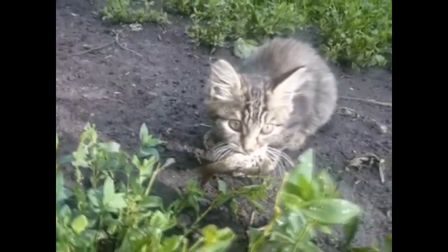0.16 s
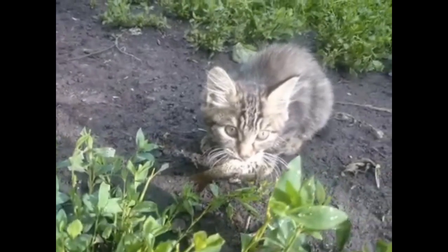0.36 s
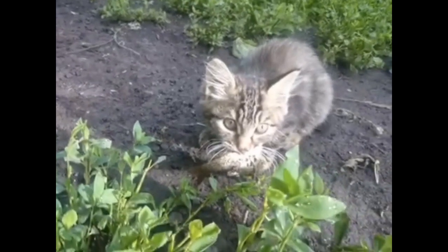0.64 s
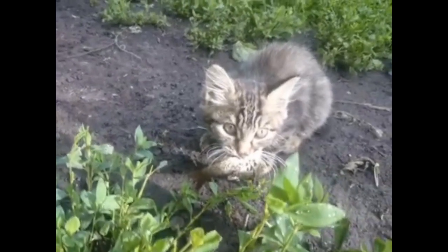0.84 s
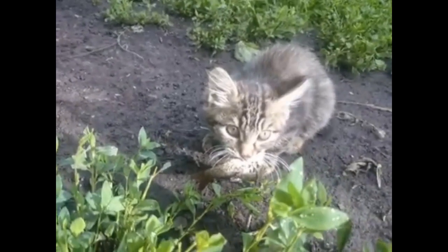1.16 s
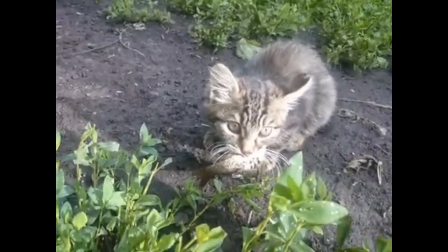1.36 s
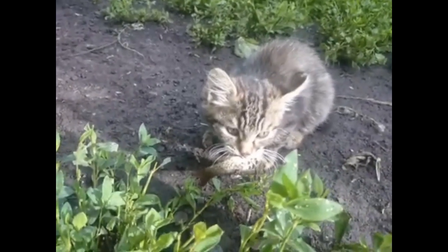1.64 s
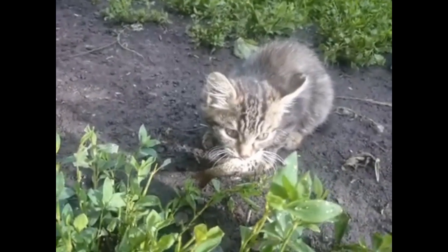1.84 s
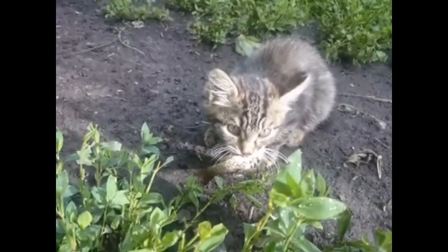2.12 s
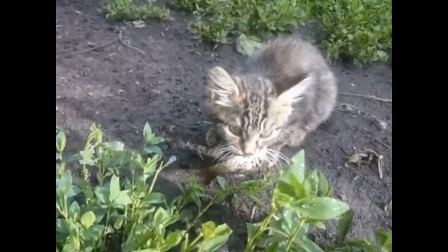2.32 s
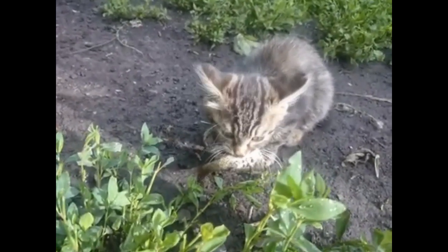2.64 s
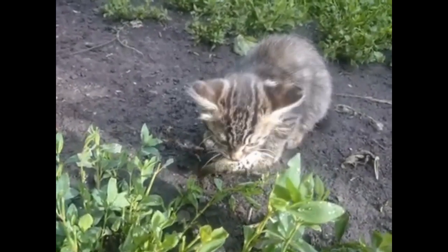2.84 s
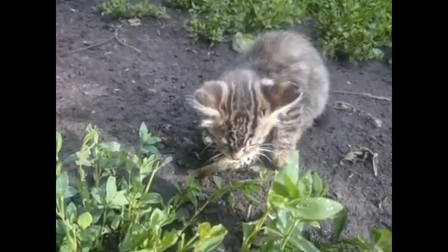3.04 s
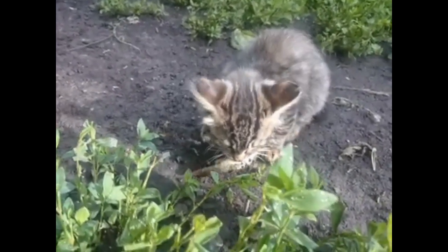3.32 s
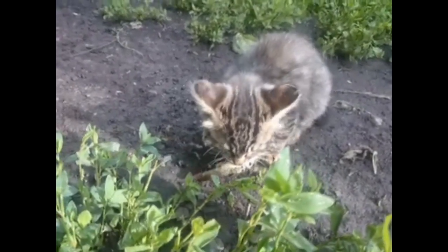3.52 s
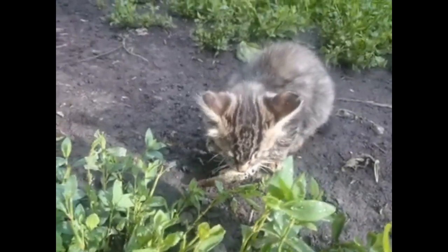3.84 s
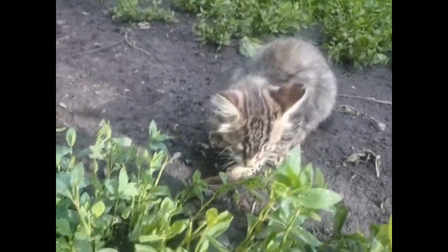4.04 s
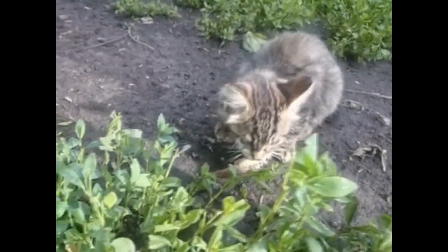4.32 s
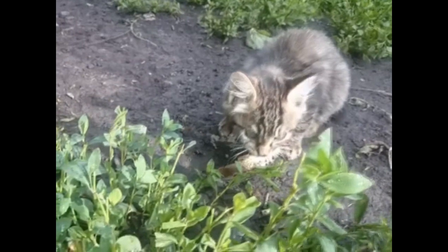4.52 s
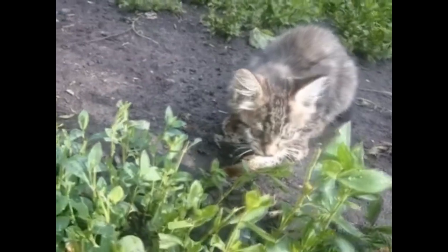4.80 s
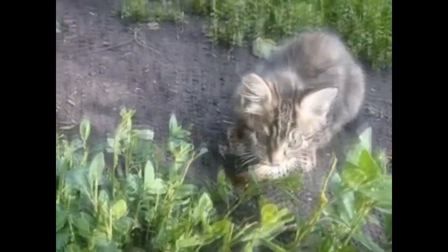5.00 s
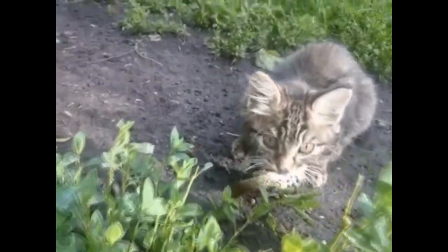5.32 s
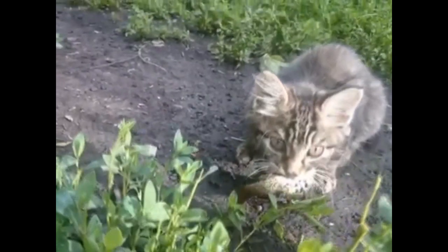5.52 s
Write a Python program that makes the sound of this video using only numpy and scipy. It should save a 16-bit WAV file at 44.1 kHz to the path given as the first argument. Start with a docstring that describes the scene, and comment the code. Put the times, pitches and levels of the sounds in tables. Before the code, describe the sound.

A soft garden murmur runs throughout, with distant sparrows chattering on the right and low wind thumps on the right of the microphone. A cricket ticks very faintly on the left in the first half second. At 0.4 seconds a kitten, close and in front, gives a short grunt, then a long, muffled, slightly fluttering and breathy yowl that climbs, holds and sinks away by 2.4 seconds. Another bird whistles softly behind it from about 1.3 to 2 seconds. Between 2.6 and 4.6 seconds leaves rustle faintly among chirps and wind bumps. At 4.7 seconds the kitten grunts again and starts a slightly louder, higher yowl, which rises and then slides down until the end at about 5.7 seconds. From 5 seconds the wind buffets strongly on the right, while a finger rubs and taps beside the microphone on the left.

```python
"""Wind buffets the right microphone over a soft garden murmur; sparrows chatter far to the right and a
cricket ticks faintly on the left. Up front, a kitten crouched over its prey gives a grunt and a long yowl,
twice: a fluttering, breathy tone muffled by a nearly shut mouth. Another bird whistles behind the first
yowl, leaves rustle in the gap, and near the end a finger rubs and taps the case beside the left port."""
import sys
import numpy as np
from scipy import signal
from scipy.fft import rfft, irfft, next_fast_len
from scipy.io import wavfile

SR = 44100
rng = np.random.default_rng(int(sys.argv[2]) if len(sys.argv) > 2 else 0)


def store_wav(level_fs):
    """Save 16-bit WAV to argv[1]."""
    pcm = np.round(np.clip(np.atleast_2d(level_fs), -1, 1) * 32767)
    wavfile.write(sys.argv[1], SR, pcm.T.astype(np.int16))


N = 249606

# wind rumble at the microphone ports: t/s, right level/dB, left level/dB
WIND_LEVELS = [(0, -38.5, -64), (.3, -54, -64), (1.1, -54, -63.5), (1.7, -47.5, -64), (2.4, -56, -71.5),
               (2.8, -51, -64), (3.3, -51.5, -62), (3.65, -55.5, -67), (4.25, -48.5, -64),
               (4.55, -55, -67.5), (5.05, -34, -54), (5.45, -31, -53.5), (5.66, -33.5, -46)]
# single eddies hitting the right port: t/s, level/dB, f/Hz
BUFFETS = [(0.034, -35, 130), (.057, -39, 145), (.086, -37.5, 130), (1.205, -32, 119), (1.32, -41, 93),
           (1.484, -42.5, 96), (1.925, -37, 108), (2.125, -43, 107.8), (2.537, -42.5, 78.5),
           (2.779, -30.5, 132), (2.832, -35.5, 137), (2.863, -37, 118), (2.923, -31.5, 112),
           (3.065, -39.5, 105), (3.107, -41, 103), (3.254, -32, 105), (3.272, -34, 103), (3.286, -26.5, 92),
           (3.332, -31, 100), (3.349, -31.5, 83), (4.255, -32.5, 96), (4.278, -41.5, 120),
           (4.452, -45.5, 94), (4.806, -34, 89.8), (4.869, -32.5, 95.1), (4.987, -18.5, 119.1),
           (5.025, -23.5, 121), (5.046, -25, 126), (5.105, -16.5, 134), (5.127, -23, 122.7),
           (5.321, -19, 122.8), (5.413, -18.5, 115), (5.56, -21.5, 111), (5.609, -19, 111)]
# EQ of the rumble and of the garden murmur on each side: f/Hz, level/dB
WIND_EQ = [(10, -3.5), (25, 6.5), (40, -3), (60, -4), (110, -11.5), (200, -21), (400, -29.5), (900, -60.5)]
AIR_LEFT_EQ = [(150, -1), (300, 1.5), (700, -4.5), (1400, -8.5), (2500, -10), (4000, -14), (5200, -26.5),
               (8000, -28), (15000, -38)]
AIR_RIGHT_EQ = [(150, -16.5), (300, 3), (700, 1.5), (1500, -3.5), (3000, -1.5), (5800, -3.5), (6500, -17),
                (8000, -23.5), (11000, -41.5)]
# base of the murmur, and amplifier hiss: left level/dB, right level/dB
AIR_BASE_DB = [-66, -64]
AMP_HISS_DB = [-75, -73]
# fader ride on the murmur: t/s, gain/dB
AIR_SWELL = [(0, 0.5), (.5, 4.5), (2.0, 3), (2.4, 0), (2.65, 3), (3.75, 0), (4.6, 5), (5.66, 7.5)]
# bursts of sparrow chatter: t/s, hold/s, level/dB, centre f/Hz, pitch spread/share
CHATTER = [(0, .02, -64.5, 4380, .2), (0.234, 0.1, -51.5, 4506, .15), (0.545, .1, -56, 4400, 0.22),
           (0.793, 0.0067, -57.5, 4055, 0.24), (0.905, 0.021, -46.5, 4697, .25),
           (1.208, 0.017, -60, 4075, 0.17), (1.564, 0.17, -56.5, 4403, .18),
           (1.868, 0.0064, -57, 4220, 0.36), (1.999, 0.0051, -64, 4770, 0.069),
           (2.175, 0.036, -54.5, 4640, 0.16), (2.268, 0.031, -55.5, 4215, .2), (2.566, .25, -52, 4943, .14),
           (2.923, 0.053, -55, 4292, 0.36), (3.183, .01, -61, 4980, .12), (3.402, 0.0076, -47, 4862, 0.26),
           (3.496, 0.081, -59.5, 4220, 0.31), (3.836, 0.0083, -57, 4240, .22),
           (4.117, 0.015, -52.5, 4780, 0.17), (4.306, 0.13, -59.5, 5210, .12),
           (4.499, 0.18, -56, 5240, 0.2), (4.899, 0.02, -48, 4540, 0.28), (4.981, 0.032, -56, 3814, 0.27),
           (5.139, 0.027, -56, 4640, 0.22), (5.32, 0.015, -55, 4190, 0.3), (5.482, 0.13, -60, 4420, .2)]
# nearer chirps (the low falling note at 1.775 s is the whistling bird's), and whistled notes: t/s, start f/Hz,
# end f/Hz, length/s, relative level/dB
NEAR_CHIRPS = [(0.201, 4000, 5380, 0.038, -43), (0.285, 4100, 4900, 0.0073, -46),
               (0.897, 5800, 3800, .04, -43), (.95, 4600, 3110, .05, -44.5), (1.55, 4350, 4550, .2, -52.5),
               (2.56, 5250, 4950, .14, -45), (2.72, 4900, 4650, .13, -51), (4.45, 5595, 5450, .22, -51),
               (1.775, 1660, 1216, 0.076, -48.5), (2.149, 5280, 3960, 0.042, -45),
               (3.395, 5800, 3640, 0.055, -38), (3.451, 4770, 3230, 0.042, -45.5),
               (4.868, 5716, 3850, .05, -38.5), (4.951, 4790, 3030, 0.098, -64.5),
               (5.008, 3800, 2780, .06, -55)]
WHISTLE_NOTES = [(1.331, 1930, 2034, 0.12, -63.5), (1.424, 1954, 2210, 0.065, -62),
                 (1.527, 2200, 1926, 0.079, -49), (1.714, 2040, 2125, 0.1, -51),
                 (1.797, 2015, 2142, 0.042, -54.5), (1.875, 1740, 2150, 0.15, -53),
                 (2.588, 2150, 1906, 0.077, -63), (2.757, 2058, 1930, 0.079, -69)]
# cricket ticks: t/s, length/s
CRICKET_TICKS = [(.20, .02), (.355, .02), (.40, .02), (.435, .025), (.48, .02), (.515, .045)]
# a grunt before each yowl: peak t/s, length/s, f/Hz, level/dB
GRUNTS = [(0.413, 0.0418, 236.9, -33.5), (4.681, 0.0764, 217.8, -42.5)]
# one curve per yowl: t/s, f/Hz, level/dB, overtone gain from the mouth opening/dB
YOWLS = [
    [(.484, 316, -60, -5), (.492, 321, -37.5, -11.5), (.525, 296.5, -37.5, -9), (.55, 268.6, -38, -17),
     (.58, 322.4, -38, -11.5), (.625, 350, -33, -11), (.66, 365, -34.5, -10.5), (.76, 510, -32.5, -6),
     (.852, 566.6, -29, -4), (.915, 547.7, -28, -2), (.935, 528.8, -29, -1), (1.03, 527.5, -29, -3),
     (1.152, 553.6, -28.5, -4), (1.37, 530, -30, -1), (1.6, 504.4, -31, 2), (1.72, 521, -33, 0.5),
     (1.78, 498, -32.5, 2.5), (1.80, 469, -33, 1), (1.86, 467.5, -33.5, 2), (1.93, 443, -35.5, -0.5),
     (2.06, 394.6, -33.5, -4), (2.212, 333.6, -32, -12.5), (2.30, 290, -40, -7.5), (2.34, 297, -41, -15),
     (2.36, 300, -76, -1)],
    [(4.72, 312, -54, -12), (4.76, 311, -37, -7.5), (4.797, 345.4, -35, -12), (4.832, 479, -35, -8),
     (4.888, 580.6, -32, 2.5), (4.95, 624, -30, 2), (5.08, 621, -25.5, 0.5), (5.217, 599, -25, 1),
     (5.28, 542, -27.5, 4), (5.32, 514.5, -28.5, -4), (5.345, 531.3, -28, 1), (5.43, 464.4, -30, -4),
     (5.53, 456, -31.5, -4.5), (5.66, 414, -31, -5)],
]
# stumbles in the voice: t/s, phase lost/cycles, pitch dip/share
CATCHES = [(.59, 0.14, 0.003), (0.923, 0.097, 0), (1.262, 0.12, 0.04), (1.387, 0.063, 0.0676),
           (1.688, 0.073, 0.058), (1.792, 0.15, 0.0025), (1.904, 0.26, 0.0106), (2.04, 0.047, 0.006),
           (2.076, .096, 0.012), (5.055, 0.036, 0), (5.468, 0.09, 0.2), (5.643, .15, 0.2)]
# EQ of the muffled throat on the overtones and on the breath: f/Hz, level/dB
THROAT_EQ = [(400, 1), (600, 5.5), (750, 6), (900, -4.5), (1020, -13), (1100, -20), (1250, -42),
             (1700, -38), (2500, -44.5)]
RASP_EQ = [(300, -8), (600, 9), (850, -1), (1080, -10), (1250, -30), (1500, -11), (2200, -25),
           (5000, -62.5)]
# the kitten's tone at the right port against the left: f/Hz, gain/dB; f/Hz, lag/rad
KITTEN_RIGHT_GAIN = [(300, 0.6), (420, -3), (530, -4.5), (700, -2), (1000, -6)]
KITTEN_RIGHT_LAG = [(300, 0.45), (430, 0.094), (540, -0.19), (650, 0.31), (1000, -.05)]
# leaf rustles: t/s, hold/s, bright right level/dB, dull left level/dB
RUSTLES = [(2.58, 0.29, -61, -71), (2.95, 0.068, -63, -69), (3.177, 0.055, -61, -75),
           (3.36, 0.093, -59.5, -62.5), (3.828, .01, -67, -70), (4.088, 0.067, -61, -59.5),
           (4.276, 0.23, -65.5, -69), (4.51, 0.12, -59, -67.5)]
# EQ of the leaves on each side: f/Hz, level/dB
LEAF_LEFT_EQ = [(700, -4.5), (1100, -4.5), (1400, 0.5), (1800, -5.5), (2600, -18), (4500, -19), (8000, -43)]
LEAF_RIGHT_EQ = [(700, -19), (1400, -4), (2500, -8.5), (5000, 0), (7000, -9), (10000, -19.5),
                 (14000, -17.5)]
# taps on the case: t/s, relative level/dB, left minus right/dB
TAPS = [(2.951, -52, -16), (3.326, -51, -6), (5.083, -60, 1.5), (5.098, -34, 12), (5.61, -43, 15)]
# finger strokes: t/s, hold/s, hiss level/dB, drag level/dB
STROKES = [(5.11, 0.039, -80.5, -45), (5.219, 0.055, -55, -35), (5.29, 0.035, -57, -44.5),
           (5.343, 0.026, -54, -36.5), (5.477, 0.048, -47, -36), (5.617, .002, -59, -44.5)]
# EQ of a stroke's high hiss and low drag: f/Hz, level/dB
RUB_HISS_EQ = [(2500, -19), (4200, -12.5), (5500, -4), (6500, -11), (7600, -18.5), (9600, -4.5),
               (10600, -13), (12000, -4), (13000, -12.5), (14800, -19.5)]
RUB_DRAG_EQ = [(60, -19), (170, 5), (350, 3.5), (800, -1.5), (1500, 2), (2100, -4), (3500, -17.5),
               (6000, -36)]

TIME = np.arange(N) / SR


def amp(db):
    """dB to gain."""
    return 10 ** (np.asarray(db, float) / 20)


def rms_one(x):
    """Scale to unit rms."""
    return x / np.sqrt(np.mean(x ** 2) + 1e-20)


def automation(rows):
    """Each column of a curve table at every sample."""
    times, *columns = np.transpose(rows)
    return [np.interp(TIME, times, column) for column in columns]


def gate(rows):
    """Open while a curve lasts, with 3 ms fades."""
    return np.clip(np.minimum(TIME - rows[0][0], rows[-1][0] + .003 - TIME) / .003, 0, 1)


def swell(at, hold, db, rise_db_s, fall_db_s):
    """Envelope that climbs to db by the given time, holds and dies away."""
    return amp(db - rise_db_s * np.clip(at - TIME, 0, 1) - fall_db_s * np.clip(TIME - at - hold, 0, 1))


def at_hz(curve, hz):
    """Read a curve on a log-frequency axis."""
    freqs, values = np.transpose(curve)
    return np.interp(np.log(hz + 1), np.log(freqs), values)


def coloured(x, eq):
    """Apply an EQ curve, then scale to unit rms."""
    size = next_fast_len(N)
    hz = np.arange(size // 2 + 1) * SR / size
    return rms_one(irfft(rfft(x, size) * amp(at_hz(eq, hz)), size)[:N])


def noise(eq):
    """Unit-rms noise through an EQ curve."""
    return coloured(rng.standard_normal(N), eq)


def drift(rate_hz):
    """Smooth random modulation of unit rms."""
    pole = np.exp(-2 * np.pi * rate_hz / SR)
    return rms_one(signal.lfilter([1], [1, -2 * pole, pole * pole], rng.standard_normal(N + SR))[SR:])


def filtered(x, kind, hz, order):
    """Butterworth filter."""
    return signal.sosfilt(signal.butter(order, hz, kind, fs=SR, output="sos"), x)


def add(track, sound, at):
    """Drop a short sound onto a track at a time in seconds."""
    start = int(at * SR)
    track[start:start + len(sound)] += sound[:N - start]


def garden_echo(x, t60_s):
    """Scattered returns from hedges and walls: a decaying noise tail of unit energy."""
    tail = rng.standard_normal(SR // 2) * amp(-60 * np.arange(SR // 2) / SR / t60_s)
    return signal.fftconvolve(x, tail / np.sqrt(np.sum(tail ** 2)))[:N]


def wind():
    """Lumpy rumble at both ports, with eddies thumping the right one."""
    right_db, left_db = automation(WIND_LEVELS)
    right = amp(right_db + 4.6 * drift(13.6)) * noise(WIND_EQ)
    left = amp(left_db + 1.3 * drift(21)) * noise(WIND_EQ)
    thumps = np.zeros(N)
    for at, db, hz in BUFFETS:
        cycles = np.arange(-1.5, 1.5, hz / SR)
        width = np.where(cycles < 0, .27, .55)   # an abrupt front, then a slower swing back
        turns = cycles * np.where(cycles < 0, 1.7, .95)
        push = np.exp(-(cycles / width) ** 2) * np.cos(2 * np.pi * turns)
        add(thumps, -amp(db) * push, at - 1.668 / hz)
    thumps = filtered(thumps, "high", 40, order=2)
    return np.array([left + amp(-25) * thumps, right + amp(-7.5) * left + thumps])


def air():
    """The bed: a gently swelling murmur of leaves and distance over steady amplifier hiss."""
    ride_db = automation(AIR_SWELL)[0] + .7 * drift(6)
    murmur = [amp(db + ride_db) * noise(eq) for db, eq in zip(AIR_BASE_DB, (AIR_LEFT_EQ, AIR_RIGHT_EQ))]
    return np.array(murmur) + amp(AMP_HISS_DB)[:, None] * rng.standard_normal((2, N))


def chirp(start_hz, end_hz, length):
    """One bird note: a gliding sine with a quick attack and slower release."""
    progress = np.arange(int(length * SR)) / (length * SR)
    hz = start_hz * (end_hz / start_hz) ** progress
    return np.sin(2 * np.pi * np.cumsum(hz) / SR) * np.sin(np.pi * progress ** .68)


def phrase(notes):
    """A dry track of bird notes."""
    track = np.zeros(N)
    for at, start_hz, end_hz, length, db in notes:
        add(track, amp(db) * chirp(start_hz, end_hz, length), at)
    return track


def flock(perch_count=8, sag_per_s=.3, floor_db=-82.5):
    """Distant chatter: a cloud of tiny chirps pitched around the loudest burst, each perch echoing."""
    bursts = np.array([swell(*row[:3], rise_db_s=420, fall_db_s=130) for row in CHATTER])
    share = bursts ** 2 / np.sum(bursts ** 2, 0)
    onsets, _, _, centres_hz, spreads = np.transpose(CHATTER)
    age = np.clip(TIME - onsets[:, None], 0, 1)
    centre_hz = np.sum(share * centres_hz[:, None] * np.exp(-sag_per_s * age), 0)
    spread = spreads @ share
    perches = np.zeros((perch_count, N))
    for at, (detune, glide, stretch) in zip(np.arange(0, N / SR, .002), rng.uniform(-1, 1, (3000, 3))):
        i = int(at * SR)
        hz = centre_hz[i] * np.exp(spread[i] * detune * abs(detune))
        note = chirp(hz * 1.05, hz * (.94 + .06 * glide), .016 * np.exp(.4 * stretch))
        add(perches[i % perch_count], note, at)
    cloud = sum(garden_echo(perch, t60_s=.12) for perch in perches)
    cloud = filtered(cloud, "low", 5700, order=6)   # distance takes the top
    return (bursts.sum(0) + amp(floor_db)) * rms_one(cloud)


def sparrows():
    """The flock and a few nearer birds, off to the right and mostly echo."""
    near = phrase(NEAR_CHIRPS)
    right = flock() + .12 * near + .53 * garden_echo(near, t60_s=.2)
    shaded = filtered(right, "low", 4600, order=4)   # the case shades the left port
    return np.array([amp(-19) * garden_echo(shaded, t60_s=.25), right])


def cricket():
    """Brief noise pulses through one high resonance, faint on the left."""
    ticks = np.zeros(N)
    for at, length in CRICKET_TICKS:
        add(ticks, rng.standard_normal(int(length * SR)), at)
    return amp([[-72], [-95]]) * filtered(ticks, "band", [7700, 8400], order=2)


def grunt_curve(peak_at, length, hz, db, edge_db=-35.5, mouth_db=-10):
    """A short low grunt in the yowls' columns: one pitch under an arch of level."""
    return [(peak_at + offset * length, hz, db + edge_db * (2 * offset) ** 2, mouth_db)
            for offset in np.linspace(-.5, .5, num=7)]


def vocal_folds(written_hz, bend, dip_s=.0065, slip_s=.002):
    """Pitch and phase of the voice; at each catch the folds hang for a few ms, then run on late."""
    dip, slip = np.zeros((2, N))
    for at, cycles, depth in CATCHES:
        age = np.clip((TIME - at) / dip_s, 0, 20)
        dip += depth * age * np.exp(1 - age)
        slip += np.pi * cycles * np.tanh((TIME - at) / slip_s)
    pitch = written_hz * (1 - dip + bend)
    return pitch, 2 * np.pi * np.cumsum(pitch) / SR - slip


def kitten(flutter_hz=60.67, tiring_db_s=3.5, rasp_db=-27, overtone_step_db=-2.5):
    """Four harmonics in a muffled throat; flutter shakes level and pitch, breath rides each cycle."""
    cries = sorted([grunt_curve(*row) for row in GRUNTS] + YOWLS)
    written_hz, level_db, mouth_db = automation(sum(cries, []))
    depth_db = 2 * (278 / written_hz) ** 2.92   # slack low notes flutter more
    flutter_rate = flutter_hz * (1 + .0637 * drift(4.3))
    flutter_db = depth_db * np.sin(2 * np.pi * np.cumsum(flutter_rate) / SR)
    # breath and pitch wobble grow as each cry goes on
    tiring = amp(tiring_db_s * sum(gate(cry) * (TIME - cry[0][0]) for cry in cries))
    wobble = .006 * tiring * drift(24.6)
    pitch, phase = vocal_folds(written_hz, bend=wobble + .038 * flutter_db)
    envelope = sum(gate(cry) for cry in cries) * np.sqrt(2) * amp(level_db + flutter_db)
    breath = amp(rasp_db) * tiring * depth_db ** 1.12 * (1 + np.cos(phase)) * noise(RASP_EQ)
    voice = envelope * breath * amp([[0], [-3]])
    for k in range(1, 5):
        hz = k * pitch
        shimmer_db = min(k - 1, 2) ** 2 * .8 * drift(30)   # higher overtones are less steady
        overtone_db = at_hz(THROAT_EQ, hz) + mouth_db + (k - 2) * overtone_step_db + shimmer_db
        gain = envelope * (amp(overtone_db) if k > 1 else 1)
        angle = k * phase - 3.18 * (k - 1)
        voice[0] += gain * np.cos(angle)
        voice[1] += gain * amp(at_hz(KITTEN_RIGHT_GAIN, hz)) * np.cos(angle - at_hz(KITTEN_RIGHT_LAG, hz))
    return voice


def whistler():
    """A bird's pure gliding notes with a ringing echo, right of centre."""
    notes = phrase(WHISTLE_NOTES)
    left = amp(-7) * notes + amp(-6) * garden_echo(notes, t60_s=.6)
    right = amp(2) * (notes + garden_echo(notes, t60_s=.97))
    return np.array([left, right])


def leaves(rise_db_s=540, fall_db_s=270):
    """Short swells of smooth rustle, bright on the right, dull on the left."""
    bright = sum(swell(at, hold, db, rise_db_s, fall_db_s) for at, hold, db, _ in RUSTLES)
    dull = sum(swell(at, hold, db, rise_db_s, fall_db_s) for at, hold, _, db in RUSTLES)
    return np.array([dull * noise(LEAF_LEFT_EQ), bright * noise(LEAF_RIGHT_EQ)])


def finger(rise_db_s=466, fall_db_s=894):
    """Skin slipping on plastic: grainy hiss coloured by the case, a lower drag and a few dull taps."""
    hiss = sum(swell(at, hold, db, rise_db_s, fall_db_s) for at, hold, db, _ in STROKES)
    drag = sum(swell(at, hold, db, rise_db_s, fall_db_s) for at, hold, _, db in STROKES)
    grains = rng.standard_normal((2, N)) * amp(1.8 * drift(120))
    left = hiss * coloured(grains[0], RUB_HISS_EQ) + drag * coloured(grains[0], RUB_DRAG_EQ)
    right = amp(-18) * drag * coloured(grains[1], RUB_DRAG_EQ)
    samples = np.arange(600)
    tap_envelope = np.exp(-samples / 130) * np.minimum(samples / 40, 1)
    for at, db, pan_db in TAPS:
        knock = tap_envelope * signal.lfilter([.1], [1, -1.8, .81], rng.standard_normal(len(samples)))
        add(left, amp(db + pan_db / 2) * knock, at)
        add(right, amp(db - pan_db / 2) * knock, at)
    return np.array([left, right])


def scene():
    """The stereo mix: the kitten up front, the garden around it."""
    return kitten() + sparrows() + whistler() + cricket() + wind() + leaves() + finger() + air()


def record(dry):
    """A steep high cut at 15 kHz across the mix."""
    return signal.sosfilt(signal.ellip(10, .5, 50, 15000, fs=SR, output="sos"), dry)


dry = scene()
out = record(dry)
store_wav(out)
```